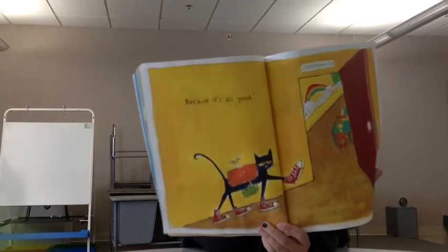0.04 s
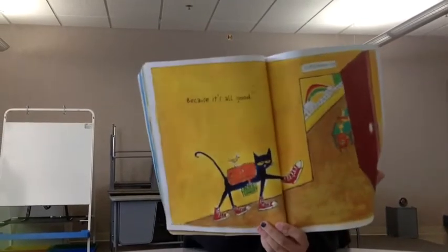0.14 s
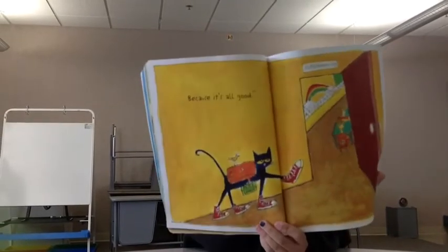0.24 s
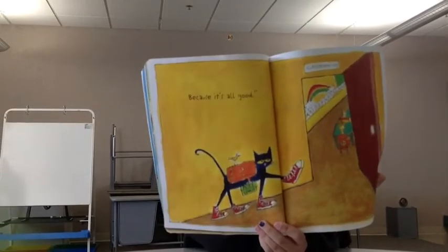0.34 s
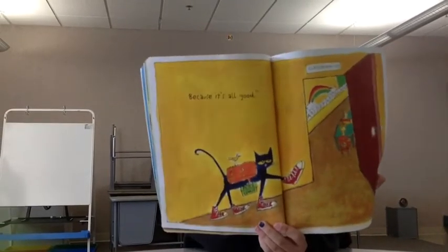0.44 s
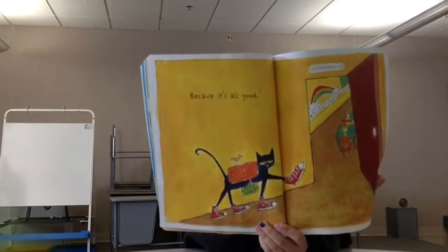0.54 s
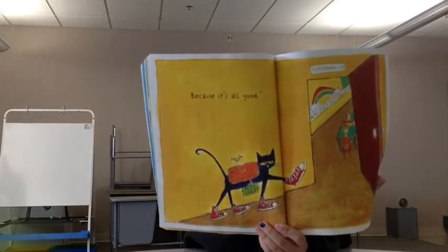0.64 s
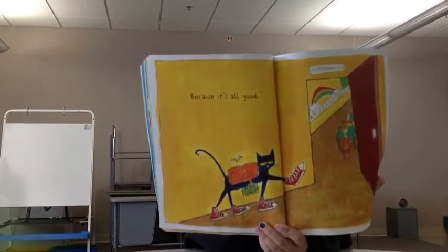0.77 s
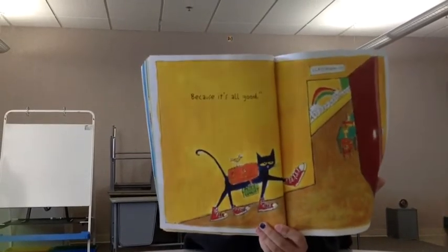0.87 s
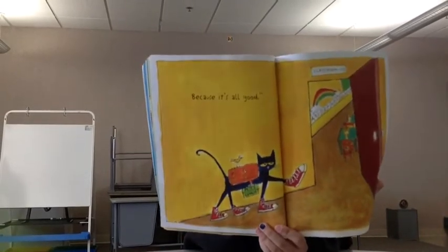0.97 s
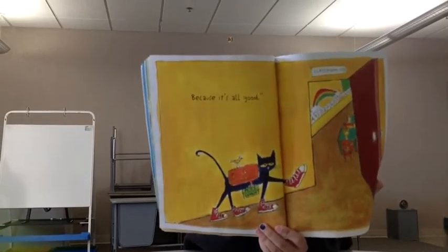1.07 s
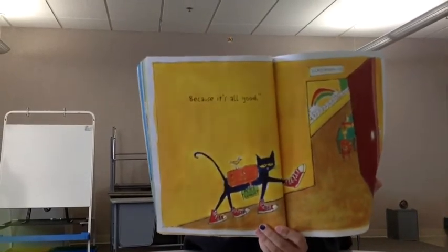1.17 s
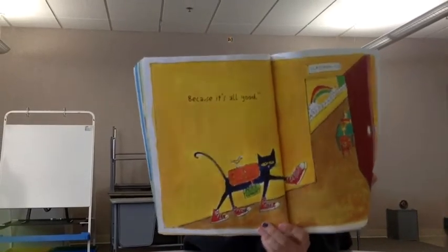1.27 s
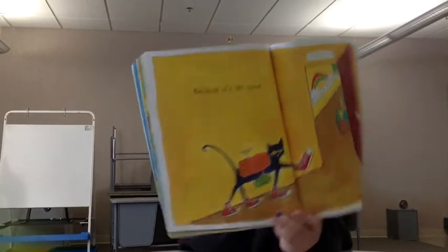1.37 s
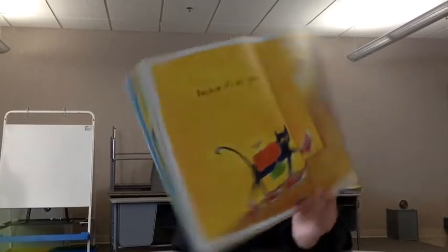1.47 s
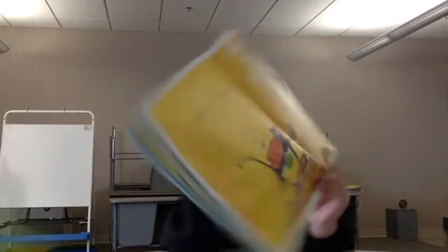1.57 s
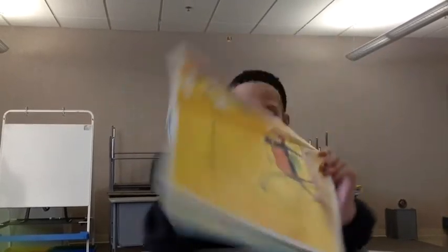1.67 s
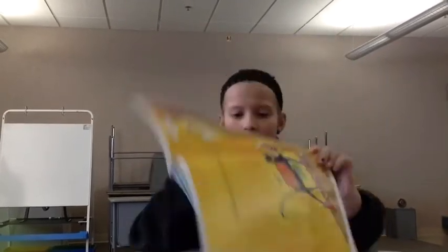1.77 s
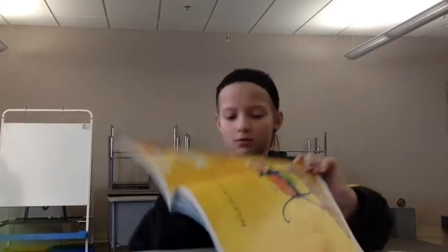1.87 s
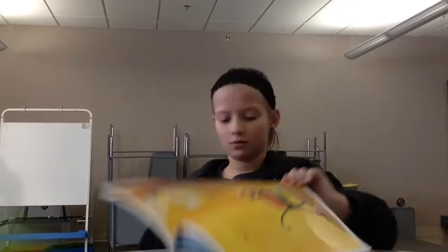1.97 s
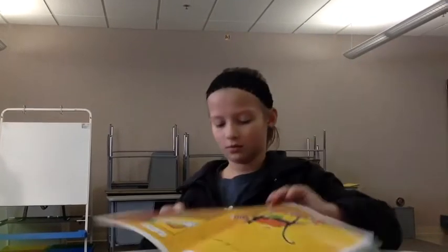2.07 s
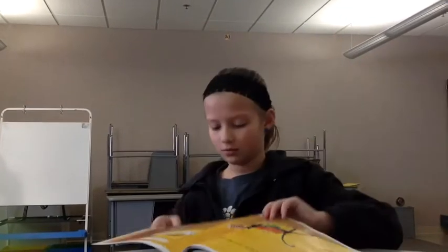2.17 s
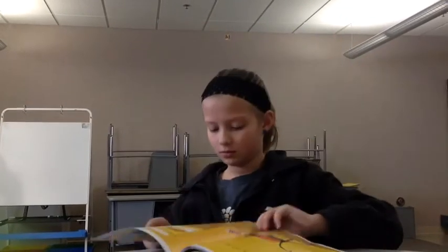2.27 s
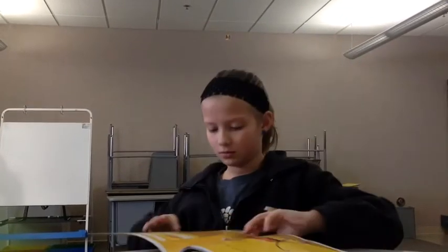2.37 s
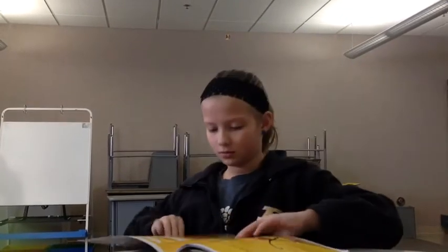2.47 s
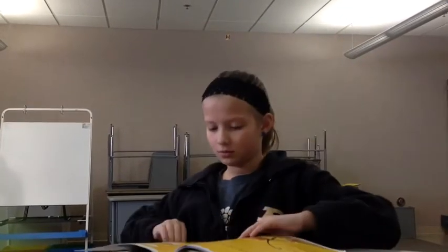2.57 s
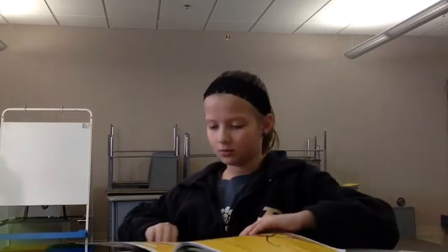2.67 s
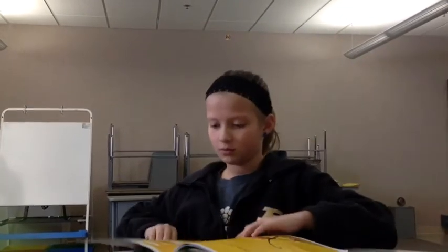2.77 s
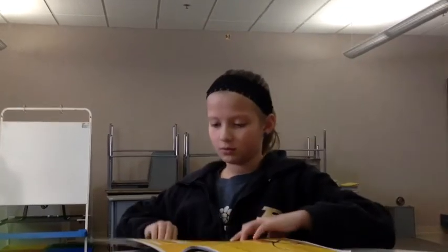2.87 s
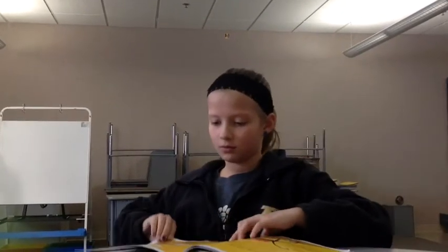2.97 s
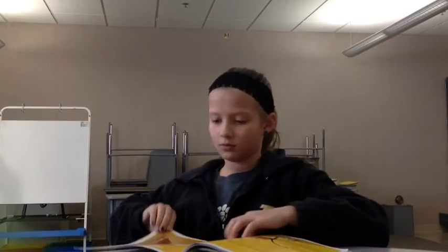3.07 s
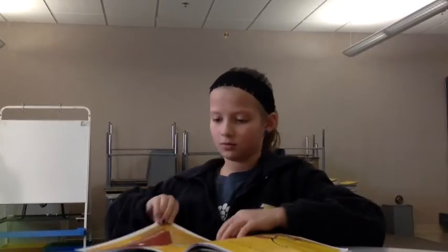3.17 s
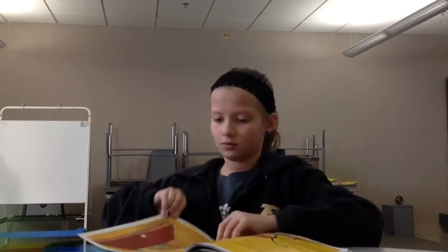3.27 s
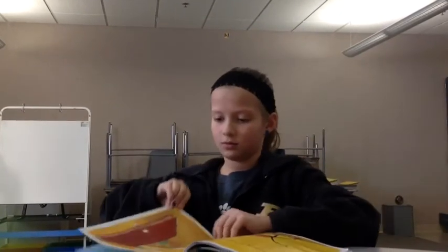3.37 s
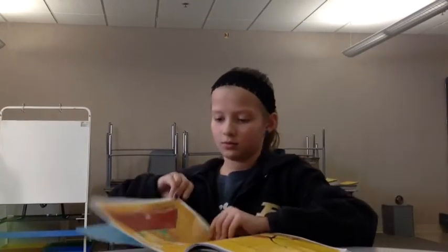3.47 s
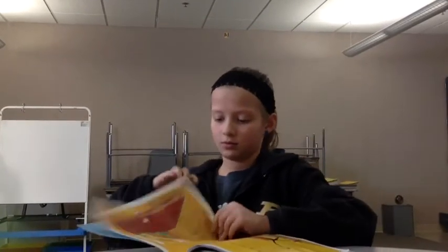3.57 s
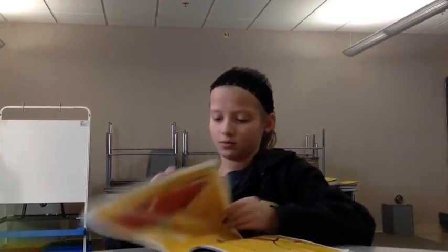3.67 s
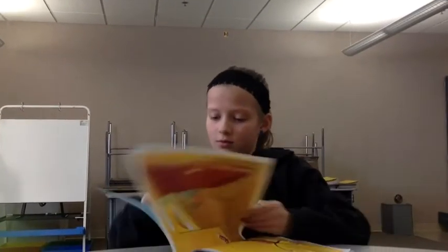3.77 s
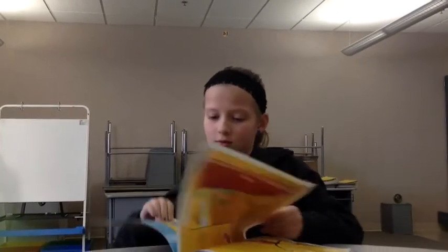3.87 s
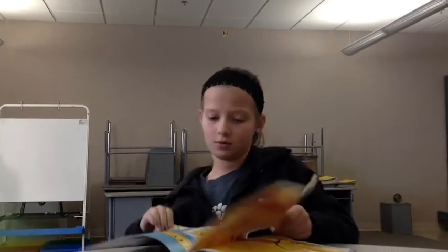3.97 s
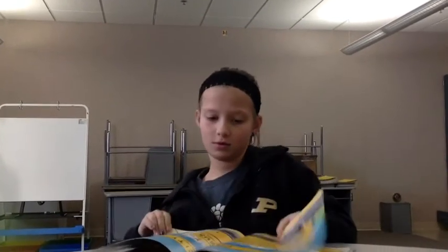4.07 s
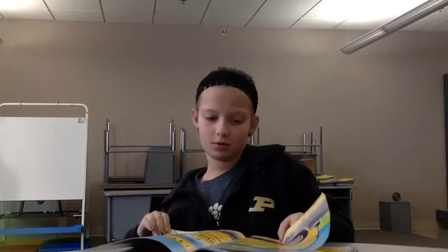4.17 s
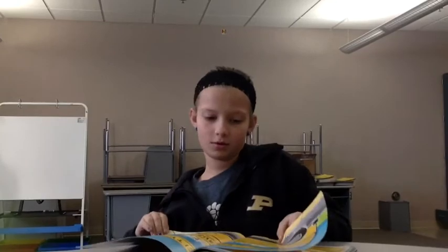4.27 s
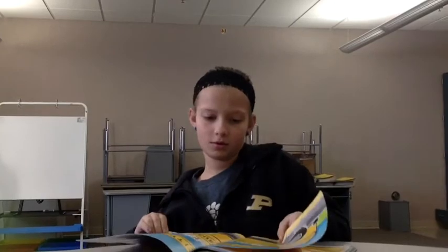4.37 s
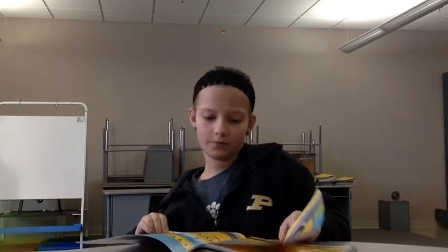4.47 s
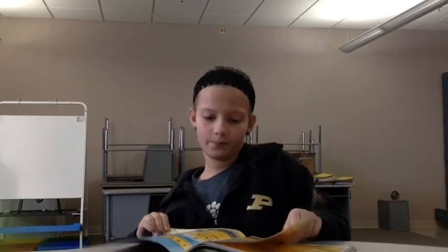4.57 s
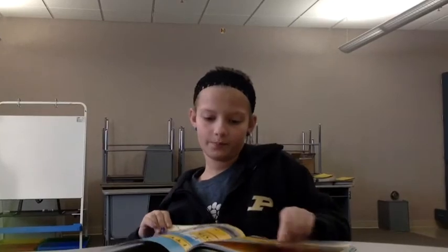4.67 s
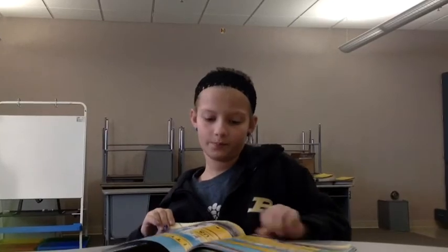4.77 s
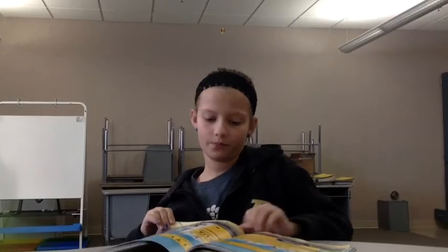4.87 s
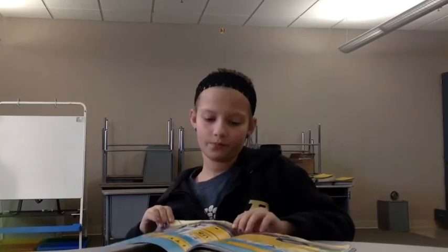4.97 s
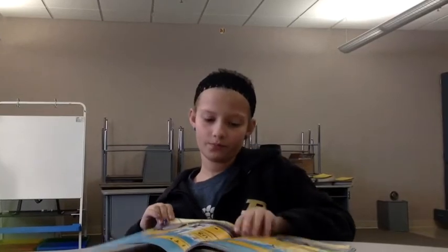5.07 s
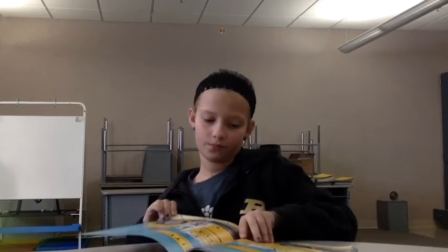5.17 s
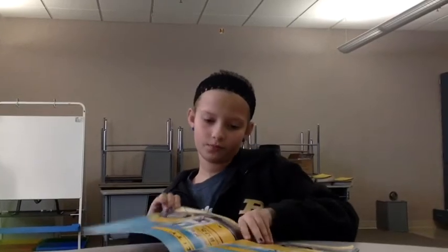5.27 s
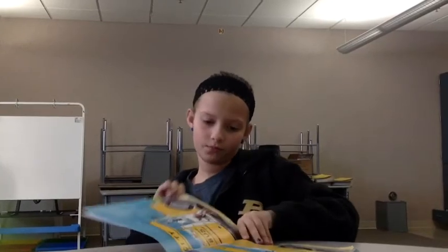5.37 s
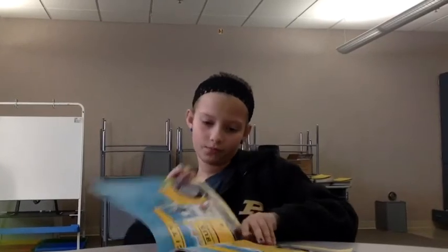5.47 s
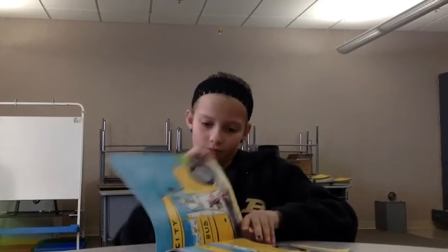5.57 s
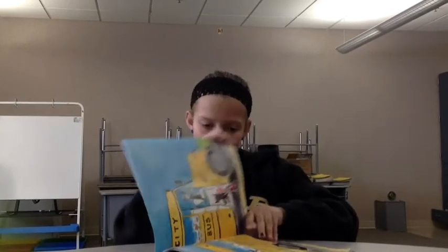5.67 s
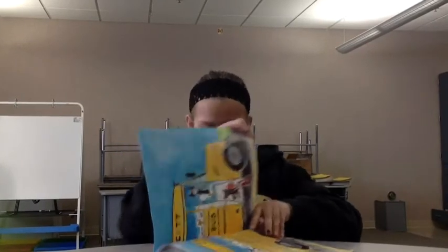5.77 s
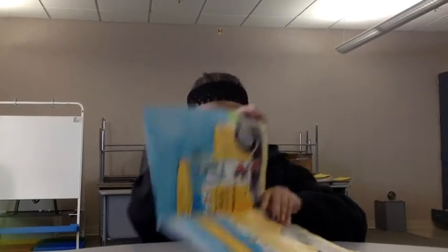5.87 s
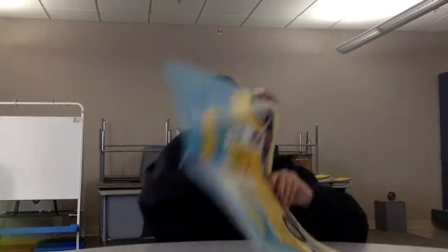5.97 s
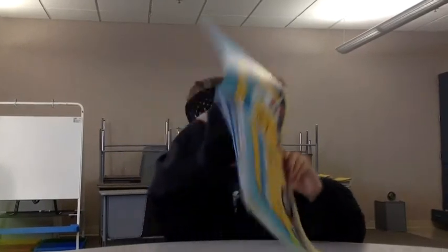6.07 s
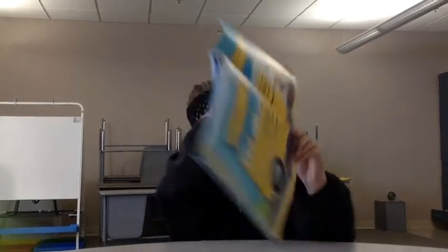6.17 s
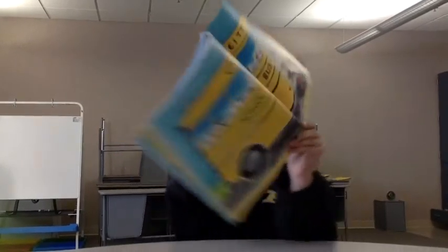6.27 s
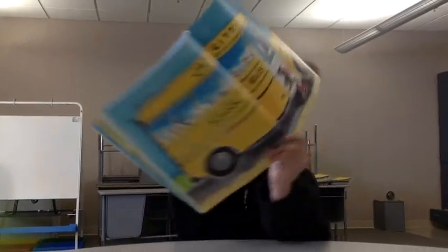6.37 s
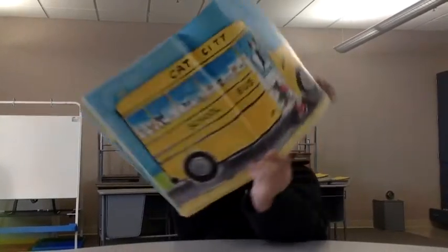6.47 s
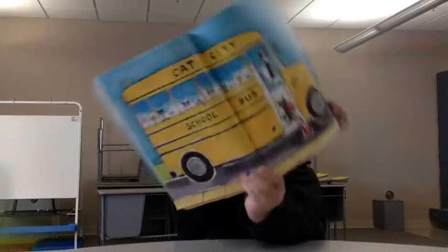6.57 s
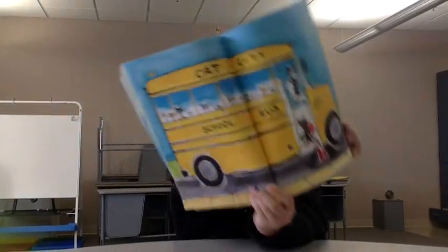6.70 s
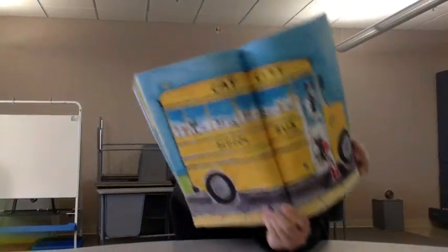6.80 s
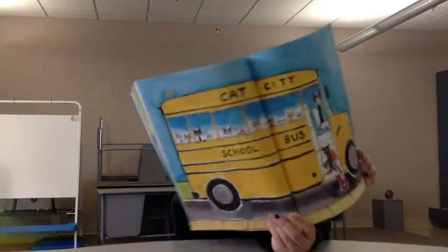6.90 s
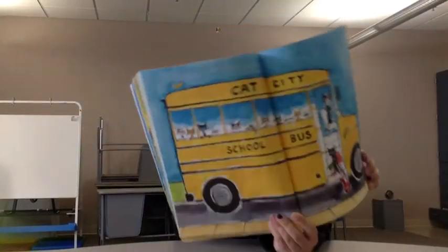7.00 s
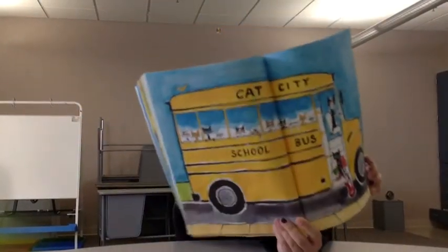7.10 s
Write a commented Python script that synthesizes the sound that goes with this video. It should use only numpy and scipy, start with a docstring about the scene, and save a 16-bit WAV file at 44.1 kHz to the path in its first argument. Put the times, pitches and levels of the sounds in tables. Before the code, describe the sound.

Close to the microphone, a big picture book is put down on a table: two dry, woody thuds with quick rebounds. Fingers scuff and flatten the paper, a large page is bent and flipped with crackling, flapping snaps, then smoothed. The book is picked up with a bright ringing paper pop, gentle knocks and faint binding pops. A small room answers briefly, with soft ventilation underneath.

```python
"""Low ventilation noise, then a soft knock: a large picture book is laid on a table, a page is turned
and smoothed, and the book is lifted again. Stiff covers knock as filtered pulses with ringing modes.
Paper snaps, crackles and buckles as pulses with bending waves; it hisses and squeaks as grainy friction.
The binding pops as short swelling sines. Reflections and a noise tail of a small room answer each sound."""
import sys
import numpy as np
from scipy import signal
from scipy.fft import rfft, irfft
from scipy.io import wavfile
from scipy.ndimage import uniform_filter1d

SR = 44100
rng = np.random.default_rng(int(sys.argv[2]) if len(sys.argv) > 2 else 0)


def store_pcm(level_fs):
    """Save levels as 16-bit WAV."""
    pcm = np.round(np.clip(level_fs, -1, 1) * 32767).astype(np.int16)
    wavfile.write(sys.argv[1], SR, np.atleast_2d(pcm).T)


N = 314874
TAPS = 2048  # pulse length, samples


def amp(db):
    """Decibels to gain."""
    return 10 ** (np.asarray(db) / 20)


def evened(x):
    """Scales to rms 1."""
    return x / np.sqrt(np.mean(x ** 2) + 1e-20)


def read(points, hz):
    """Reads a table on a log-frequency axis."""
    f, value = np.transpose(points)
    return np.interp(np.log(hz + 1), np.log(f + 1), value)


def add(mix, s, sound):
    """Mixes a sound in at time s."""
    part = mix[max(round(s * SR), 0):][:len(sound)]
    part += sound[:len(part)]


def ring(x, modes, damping_db=0):
    """Adds the short ring of each mode (pitch_hz, width_hz, level_db) to the direct pulse."""
    rings = 0
    for hz, width_hz, db in modes:
        b, a = signal.iirpeak(hz, hz / width_hz, fs=SR)
        rings = rings + amp(db) * signal.lfilter(b, a, x + 1e-18)
    return x + amp(damping_db) * rings


def sheet(low_hz, high_hz, tick_db, tick_hz=12000, steepness=4.84):
    """Causal pulse of a sheet: size sets the low edge, stiffness the high edge, the rim adds a tick."""
    hz = np.fft.rfftfreq(TAPS, 1 / SR) + 1
    body = 1 / (1 + (hz / high_hz) ** steepness)
    tick = amp(tick_db) ** 2 / (1 + (hz / tick_hz) ** 2)
    power = (body + tick) / (1 + (low_hz / hz) ** 4) + 1e-8
    # a folded cepstrum gives minimum phase
    cepstrum = irfft(np.log(power) / 2)
    cepstrum[1:TAPS // 2] *= 2
    cepstrum[TAPS // 2 + 1:] = 0
    return irfft(np.exp(rfft(cepstrum)))


PAGE_EDGE_HZ, PAGE_STRETCH = 2050, 0.56  # upper edge at which modes hold; exponent of their rise with it


def blows(rows, shiver_db, shiver_t60, shiver_low_hz, tick_hz, steepness, bend_hz, modes=()):
    """Pulses, each followed by bending waves running to and fro in the sheet; tighter bends ring higher."""
    out, t = np.zeros(N), np.arange(TAPS) / SR
    envelope = amp(-60 * t / shiver_t60) * (1 - np.exp(-t / 0.0014))
    highpass = signal.butter(1, shiver_low_hz, "high", fs=SR)
    for s, db, low_hz, high_hz, tick_db in rows:
        waves = rng.standard_normal(TAPS) * envelope
        waves *= amp(shiver_db) / np.linalg.norm(waves)
        drive = signal.unit_impulse(TAPS) + signal.lfilter(*highpass, waves)
        pulse = signal.fftconvolve(drive, sheet(low_hz, high_hz, tick_db, tick_hz, steepness))
        stretch = min((high_hz / PAGE_EDGE_HZ) ** PAGE_STRETCH, 4)
        stretched = [(hz * stretch, width_hz * stretch, level_db) for hz, width_hz, level_db in modes]
        add(out, s, amp(db) * ring(pulse, stretched))
    # bending waves carry treble faster than bass: two allpasses spread each pulse into a tiny chirp
    pole = np.exp(-2 * np.pi * bend_hz / SR)
    return signal.sosfilt([[-pole, 1, 0, 1, -pole, 0]] * 2, out + 1e-18)


# spectrum of ventilation and fine hiss, relative: (pitch_hz [Hz], density_db [dB per Hz])
AIR_SPECTRUM = [(15, -81), (25, -40), (101, -16), (129, -7.5), (173, -5), (259, 0.5), (330, -6),
                (367, -6.5), (521, -11), (845, -15), (1260, -23.5), (1450, -23), (2610, -28),
                (13500, -30.5), (15400, -34.5)]
# duct resonances: (pitch_hz [Hz], width_hz [Hz], boost_db [dB above the air noise])
DUCT_MODES = [(136.3, 14, 4), (204.8, 13, 5.5), (239.5, 7.5, 1), (358.6, 10.3, 7.5), (438, 8.6, 2.5)]
AIR_RMS_DB = -56.5


def ventilation():
    """Steady air noise, coloured by the duct's resonances."""
    hz = np.fft.rfftfreq(N, 1 / SR)
    colour_db = read(AIR_SPECTRUM, hz)
    for mode_hz, width_hz, boost_db in DUCT_MODES:
        colour_db = colour_db + boost_db / (1 + (2 * (hz - mode_hz) / width_hz) ** 2)
    noise = irfft(rfft(rng.standard_normal(N)) * amp(colour_db), N)
    return amp(AIR_RMS_DB) * evened(noise)


# a cover meets the table or a hand, levels relative: (start_s [s], level_db [dB], low_hz [Hz],
# high_hz [Hz], rim_db [dB re level], rim_hz [Hz], rim_to_flat_s [s], rebound_db [dB re level],
# ring_hz [Hz], ring_db [dB])
COVER_KNOCKS = [(0.0516, -9, 290, 750, -20, 1410, 0.0016, -21, 700, -1),
                (1.8208, 13, 235, 616, -3.5, 2700, 0.00086, -30, 370, -6),
                (1.8297, -0.5, 240, 754, -21, 2800, 0.00092, -16, 570, -3),
                (2.0443, 16, 150, 810, -7.5, 1950, 0.00022, -33, 766, 0),
                (2.053, 10.5, 320, 805, -22, 1800, 0.00047, -24, 565, 4),
                (2.0593, 8.5, 160, 600, -27, 1700, 0.00052, -26, 355, -1),
                (2.0642, 6.5, 230, 750, -20, 1900, 0.0003, -22, 470, -1),
                (2.083, 2.5, 190, 520, -22, 1900, 0.00045, -25, 295, -4),
                (2.487, -9.5, 180, 400, -24, 1200, 0.0017, -22, 290, -2),
                (5.6131, 1.5, 165, 1700, -3, 2200, 0.0005, -10, 760, -1),
                (5.7441, -2, 240, 1050, -2, 1700, 0.0014, -18, 466, 2),
                (5.8831, -6.5, 380, 1300, -0.5, 2200, 0.0024, -15, 947, 3),
                (5.8886, -4.5, 170, 1000, -9, 1800, 0.00046, -14, 760, 1),
                (5.8941, -6.5, 460, 1450, -2, 2150, 0.0006, -14, 947, 6),
                (5.8964, 0, 145, 1080, -6, 2050, 0.00021, -13, 574, 3),
                (5.905, -7, 125, 800, -8, 2000, 0.00035, -13, 371, 0)]
RIM_LOW_HZ = 1010
RIM_TICK_DB, RIM_TICK_PER_DB = -39.5, 1.5  # tick of a 0 dB crack; harder cracks are brighter


def rim_blows():
    """A cover lands rim first, with a dry crack."""
    rows = []
    for s, db, _, _, rim_db, rim_hz, *_ in COVER_KNOCKS:
        crack_db = db + rim_db
        rows.append((s, crack_db, RIM_LOW_HZ, rim_hz, RIM_TICK_DB + RIM_TICK_PER_DB * crack_db))
    return rows


REBOUND_S, REBOUND_SHRINK, REBOUND_LOSS_DB = .0074, .78, 3  # each rebound comes sooner and weaker
REBOUND_JITTER = 0.12  # share of each gap left to chance
THUD_TICK_DB = -36


def cover_blows(s, db, low_hz, high_hz, rebound_db, count=4):
    """The cover lands flat with a thud, then chatters in quickening rebounds."""
    rows = [(s, db, low_hz, high_hz, THUD_TICK_DB)]
    for k, chance in enumerate(rng.uniform(-1.28, 1, count)):
        s += REBOUND_S * REBOUND_SHRINK ** k * (1 + REBOUND_JITTER * chance)
        rows.append((s, db + rebound_db - k * REBOUND_LOSS_DB, low_hz, high_hz, THUD_TICK_DB))
    return rows


KNOCK_RING_WIDTH_HZ = 85


def thuds():
    """Each thud follows its rim's crack; the point of contact picks out one resonance of the cover."""
    out = np.zeros(N)
    for s, db, low_hz, high_hz, _, _, flop_s, rebound_db, ring_hz, ring_db in COVER_KNOCKS:
        rows = cover_blows(s + flop_s, db, low_hz, high_hz, rebound_db)
        thud = blows(rows, shiver_db=-3.5, shiver_t60=0.021, shiver_low_hz=700,
                     tick_hz=5540, steepness=5.9, bend_hz=2200)
        out += ring(thud, [(ring_hz, KNOCK_RING_WIDTH_HZ, ring_db)])
    return out


# resonances of the stiff cover: (pitch_hz [Hz], width_hz [Hz], level_db [dB before damping])
STIFF_COVER_MODES = [(151, 45, -4), (250, 90, -1), (348, 90, 0), (505, 150, -8), (673, 210, -3.5),
                     (1580, 300, -3)]
# resonance of its rim: (pitch_hz [Hz], width_hz [Hz], level_db [dB re direct pulse])
COVER_RIM_MODES = [(4700, 260, 6)]


def covers():
    """Flat thuds ring the whole cover; cracks ring its rim."""
    rims = blows(rim_blows(), shiver_db=-10, shiver_t60=0.015, shiver_low_hz=900,
                 tick_hz=8000, steepness=12, bend_hz=2200)
    flats = ring(thuds(), STIFF_COVER_MODES, damping_db=-1.5)
    return amp(-2.0) * flats + ring(rims, COVER_RIM_MODES)


def thump(push_s=0.0011, push_db=-66):
    """A landing cover pushes out a soft puff of air."""
    out, u = np.zeros(N), np.arange(TAPS) / SR / push_s
    for s, db, *_ in COVER_KNOCKS:
        add(out, s, amp(db + push_db) * u * np.exp(1 - u))
    return out


def fibres(grains_per_s=1400, catch_s=0.02):
    """Paper fibres catch and slip: random grains, their sizes, a smooth hiss and slow clumping."""
    size = np.minimum(rng.exponential(1, N), 4)
    slip = rng.standard_normal(N)
    grains = rng.choice([-1., 1.], N) * (rng.random(N) < grains_per_s / SR)
    span = max(round(catch_s * SR), 2)
    clumps = uniform_filter1d(uniform_filter1d(rng.standard_normal(N), span), span // 2)
    return grains, size, slip, evened(clumps)


def friction(fibre, start_s, end_s, spread_db, smooth=0.85, catch_db=2.5):
    """Times and drive of one grainy stretch: uneven grains in clumps over a smooth hiss."""
    at = slice(max(round(start_s * SR), 0), round(end_s * SR))
    grains, size, slip, catches = (x[at] for x in fibre)
    drive = evened(grains * amp(spread_db * size)) + smooth * slip
    clumping_db = catch_db * np.tanh(spread_db / 4) * catches
    return np.arange(N)[at] / SR, evened(drive * amp(clumping_db))


def swell(out, fibre, s, rise_s, fall_s, db, colour, spread_db, sharpness=1.52):
    """One grainy burst rises to its peak at s and falls away, along a sharpened triangle."""
    now, drive = friction(fibre, s - rise_s, s + fall_s, spread_db)
    envelope = np.interp(now, [s - rise_s, s, s + fall_s], [0, 1, 0]) ** sharpness
    add(out, now[0], amp(db) * signal.fftconvolve(drive * envelope, colour))


# paper hisses, scuffs and crunches; the 5.617 s row is the bright fizz of a pop. Levels relative:
# (peak_s [s], rise_s [s], fall_s [s], level_db [dB], low_hz [Hz], high_hz [Hz], hiss_db [dB re body])
PAPER_SCUFFS = [(.197, 0.13, 0.099, -55, 300, 2350, -18), (1.84, 0.25, 0.26, -44, 241, 1410, -15),
                (2.062, 0.034, 0.14, -36, 800, 2250, -28), (2.1, 0.028, 0.1, -42, 400, 900, -15),
                (2.262, 0.037, 0.042, -42, 450, 1800, -10), (2.383, 0.0099, 0.067, -44, 7030, 14460, -14),
                (2.89, 0.16, 0.07, -40, 150, 1100, -19.5), (3.05, 0.042, 0.06, -48.5, 900, 3000, -19),
                (3.16, 0.082, 0.098, -46.5, 1170, 6300, -6), (3.214, 0.067, .055, -45, 1170, 6200, -10),
                (3.32, 0.033, 0.058, -40, 400, 3550, -22), (3.392, 0.054, 0.042, -54, 500, 4000, -3),
                (3.503, 0.0037, 0.072, -35.5, 496, 2920, -14), (3.627, 0.035, 0.027, -39, 250, 2600, -37),
                (3.966, 0.012, .08, -31, 700, 1550, -56), (4.062, 0.051, 0.044, -34.5, 450, 1550, -45),
                (4.336, 0.0092, 0.066, -44, 400, 3110, -33), (4.43, 0.057, 0.17, -43, 704, 2620, -24),
                (4.61, 0.12, 0.066, -49.5, 300, 5130, -21), (4.776, 0.075, 0.21, -58.5, 1180, 7600, -6.5),
                (5.1, .04, 0.057, -53, 610, 4450, -23), (5.4, 0.055, 0.1, -39.5, 403, 2100, -23),
                (5.565, 0.18, 0.04, -40.5, 398, 1590, -31), (5.607, 0.0035, 0.045, -31, 350, 1900, -25),
                (5.738, 0.016, 0.04, -41, 800, 1700, -40), (5.897, 0.016, 0.018, -32, 550, 1400, -48),
                (5.92, 0.033, 0.17, -54.5, 3500, 6000, -14), (5.617, .012, 0.03, -38.5, 9500, 13000, -22),
                (6.055, 0.15, 0.13, -54, 11000, 15000, -16), (6.198, 0.14, .1, -55, 7100, 12500, -11)]
SCUFF_GRAIN_DB, SCUFF_GRAIN_HZ = 2, 2000  # size spread at this high edge; brighter scuffs are more even


def scuffs(fibre):
    """Hisses, scuffs and crunches of paper: swelling grainy noise, each in its own band."""
    out = np.zeros(N)
    for s, rise_s, fall_s, db, low_hz, high_hz, hiss_db in PAPER_SCUFFS:
        spread_db = SCUFF_GRAIN_DB * SCUFF_GRAIN_HZ / high_hz
        swell(out, fibre, s, rise_s, fall_s, db, sheet(low_hz, high_hz, hiss_db), spread_db)
    return out


def flex(x, patchy_db=1.7, count=5):
    """A bending sheet keeps shifting its resonances, so the colour of its rustle comes and goes."""
    z = signal.stft(x, SR, nperseg=512, noverlap=384)[2]
    patches = rng.standard_normal(z.shape)
    for axis in (0, 1):
        patches = uniform_filter1d(uniform_filter1d(patches, count, axis), count, axis)
    gain = evened(amp(patchy_db * evened(patches)))
    return signal.istft(z * gain, SR, nperseg=512, noverlap=384)[1][:N]


# resonances of a bowed page: (pitch_hz [Hz], width_hz [Hz], level_db [dB before damping]);
# pitch and width before stretching by the bend
BOWED_PAGE_MODES = [(443, 240, -0.5), (1200, 98, -12), (1610, 110, -8), (2480, 210, -18)]


def paper():
    """All grainy paper noise; fingers damp the page while it slides, so it rings less."""
    fibre = fibres()
    rustle = scuffs(fibre) + squeaks(fibre) + bends(fibre)
    return amp(-0.5) * ring(flex(rustle), BOWED_PAGE_MODES, damping_db=-12)


# small creases snap and page edges flick, levels relative: (start_s [s], level_db [dB],
# high_hz [Hz], tick_db [dB re body])
CREASE_SNAPS = [(.1568, -25.5, 2610, -40), (.236, -25, 2860, -22), (1.7506, -17, 1750, -29),
                (1.7715, -18, 1950, -31), (2.1035, -9.5, 2730, -33), (2.133, -15, 6560, -2),
                (2.156, -12.5, 2280, -13), (2.3787, -8.5, 2700, -4), (2.535, -8.5, 1510, -8),
                (2.5794, -17.5, 3440, -22), (2.6724, -26, 2370, -10), (2.7377, -16.5, 3180, -39),
                (3.2449, -17.5, 6440, -23), (3.3245, -20, 4300, -25), (3.3608, -11, 1500, -14.5),
                (3.3895, -14, 4800, -20), (3.3985, -18, 5500, -30), (3.4418, -8.5, 1700, -13.5),
                (3.4998, -10, 4760, -10), (3.5552, -14, 2770, -11), (3.593, -12, 1890, -27),
                (3.628, -7, 4300, -24), (3.677, -21, 2600, -27), (3.6992, -11, 1800, -29),
                (3.7558, -3.5, 2050, -23), (3.8336, -1.5, 1460, -39), (3.9121, -5, 1600, -42),
                (3.9386, -2.5, 2160, -42), (3.941, -5, 2000, -40), (3.963, -4.5, 3020, -44),
                (4.0085, -15, 3600, -36), (4.0155, -11, 1490, -41), (4.0317, -5.5, 2400, -36),
                (4.1657, -16.5, 3280, -23), (4.3081, -16, 2630, -29), (4.3168, -20, 3200, -25),
                (4.3236, -4, 3200, -25), (4.3319, -13, 4600, -26), (4.3445, -17, 4000, -28),
                (4.4178, -4, 3050, -21), (4.4502, -18, 4500, -28), (4.463, -18, 3000, -28),
                (4.4265, -10.5, 4290, -35), (4.4415, -8.5, 2370, -35), (4.5255, -26, 3200, -16),
                (4.583, -21.5, 7460, -14), (4.6029, -9, 4300, -23), (4.6052, -12.5, 4000, -29),
                (4.6327, -19.5, 2100, -8), (4.821, -26.5, 7480, -20), (4.905, -27.5, 5230, -8),
                (4.973, -30, 4400, -28), (5.1472, -21.5, 1800, -11), (5.3857, -7.5, 2030, -25),
                (5.4056, -15.5, 5100, -35), (5.6071, -0.5, 3400, -16), (5.6095, -5, 2900, -29),
                (5.6765, -24, 2480, -30), (5.7962, -11.5, 1940, -24), (6.015, -12.5, 1070, -23),
                (6.2361, -15.5, 1460, -26), (6.2876, -8, 1300, -24), (6.2981, -29, 8150, 5.5),
                (6.6152, -15.5, 1710, -18), (6.5707, -17, 1100, -18), (6.7525, -17.5, 2020, -30),
                (7.079, -28.5, 13600, -12)]
SNAP_SPAN = 2.84  # upper edge over lower edge


def pages():
    """Clear snaps, quick clusters and faint crackles, each a pulse that rings the bowed page."""
    rows = list(CREASE_SNAPS) + clusters() + crackles()
    rows = [(s, db, hz / SNAP_SPAN, hz, tick_db) for s, db, hz, tick_db in rows]
    return amp(-3.0) * blows(rows, shiver_db=-1.5, shiver_t60=0.0076, shiver_low_hz=1530,
                             tick_hz=11100, steepness=7.5, bend_hz=3000, modes=BOWED_PAGE_MODES)


# a fingertip drags on the glossy page, levels relative: (loudest_s [s], length_s [s],
# level_db [dB], pitch_hz [Hz], ring_db [dB])
FINGER_SQUEAKS = [(2.121, 0.024, -33.5, 3530, -1), (2.391, 0.12, -41, 2550, -5),
                  (2.438, 0.014, -42, 3050, -3), (2.458, 0.024, -39, 1100, 7),
                  (4.584, 0.022, -46, 6740, -15)]
SQUEAK_SPAN, SQUEAK_GRAIN_DB = 1.22, -1  # ratio of each band edge to the pitch; spread of grain sizes
SQUEAK_Q = 13


def squeaks(fibre):
    """A dragging fingertip: brief friction in a narrow ringing band."""
    out = np.zeros(N)
    for s, length_s, db, hz, ring_db in FINGER_SQUEAKS:
        band = sheet(hz / SQUEAK_SPAN, hz * SQUEAK_SPAN, tick_db=-20, steepness=17)
        colour = ring(band, [(hz, hz / SQUEAK_Q, ring_db)])
        swell(out, fibre, s, length_s / 2, length_s / 2, db, colour, SQUEAK_GRAIN_DB)
    return out


# effort of bending paper, one curve for each move: (time_s [s], level_db [dB, relative])
FLATTENING_EFFORT = [(2.2, -58), (2.336, -65.5), (2.468, -57), (3.13, -65), (3.25, -58)]
PAGE_TURN_EFFORT = [(3.249, -58.5), (3.394, -58), (3.66, -51), (3.735, -47.5), (3.883, -50.5), (3.938, -57),
                    (4.074, -53.5), (4.134, -55.5), (4.25, -62)]
SETTLING_EFFORT = [(4.25, -58), (4.512, -65), (4.649, -59.5), (4.88, -63.5), (5.3, -63.5)]
LIFTING_EFFORT = [(5.3, -71), (5.428, -60), (5.558, -55), (5.72, -63)]
OPENING_EFFORT = [(5.95, -58.5), (6.276, -59.5), (6.446, -55.5), (6.676, -63), (6.862, -63), (7.1, -68)]
MOVES = [FLATTENING_EFFORT, PAGE_TURN_EFFORT, SETTLING_EFFORT, LIFTING_EFFORT, OPENING_EFFORT]
BEND_LOW_HZ, BEND_HIGH_HZ, BEND_DB, BEND_GRAIN_DB = 310, 1920, 10.5, 5
FIRM_DB, FIRM_GROWTH = -45.5, 1.27  # effort of a firm bend; dB of rustle per dB of effort
FIZZ_DB, FIZZ_GROWTH, FIZZ_LOW_HZ, FIZZ_HIGH_HZ = -61.5, 0.37, 1940, 6700  # grows much less


def bends(fibre, fade_s=0.023):
    """Bending paper rubs fibre on fibre: a rustling body that grows with effort, and a fine fizz."""
    out = np.zeros(N)
    body = sheet(BEND_LOW_HZ, BEND_HIGH_HZ, tick_db=-27)
    fizz = sheet(FIZZ_LOW_HZ, FIZZ_HIGH_HZ, tick_db=-6)
    for move in MOVES:
        times, levels = np.transpose(move)
        now, drive = friction(fibre, times[0] - fade_s, times[-1] + fade_s, BEND_GRAIN_DB)
        to_edge_s = np.minimum(now - now[0], now[-1] - now)
        drive = drive * np.minimum(to_edge_s / (2 * fade_s), 1) ** .5
        effort_db = np.interp(now, times, levels) - FIRM_DB
        body_gain = amp(FIRM_DB + BEND_DB + FIRM_GROWTH * effort_db)
        fizz_gain = amp(FIZZ_DB + FIZZ_GROWTH * effort_db)
        add(out, now[0], signal.fftconvolve(drive * body_gain, body))
        add(out, now[0], signal.fftconvolve(drive * fizz_gain, fizz))
    return out


CRACKLES_PER_S, CRACKLE_ABOVE_DB, CRACKLE_SPREAD_DB = 16, 31, 2  # rate; level above the effort curve
CRACKLE_HZ, CRACKLE_SPREAD_OCTAVES, CRACKLE_TICK_DB = 2350, 0.71, -26


def crackles(count=50):
    """Faint crackles come at random while paper bends, and grow with the effort."""
    rows = []
    for move in MOVES:
        times, levels = np.transpose(move)
        moments = times[0] + np.cumsum(rng.exponential(1, count)) / CRACKLES_PER_S
        for s, (size, colour) in zip(moments, rng.standard_normal((count, 2))):
            if s < times[-1]:
                db = np.interp(s, times, levels) + CRACKLE_ABOVE_DB + CRACKLE_SPREAD_DB * size
                hz = CRACKLE_HZ * 2 ** (CRACKLE_SPREAD_OCTAVES * colour)
                rows.append((s, db, hz, CRACKLE_TICK_DB))
    return rows


# paper crackles in quick clusters, or a page edge flutters, levels relative: (start_s [s],
# length_s [s], level_db [dB], drift_db [dB over the length], high_hz [Hz])
CRACKLE_CLUSTERS = [(3.5025, .03, -8, -10, 2400), (3.6915, .011, -8, 0, 1600), (3.766, .028, -18, 3, 1700),
                    (3.885, .025, -16, 2, 1300), (3.968, .045, -5.5, -7, 1800), (4.042, .036, -13, 1, 1800),
                    (4.338, .02, -18, -2, 3300), (4.435, .034, -17.5, -5, 3300),
                    (4.608, .024, -21, -4, 5900)]
TICKS_PER_S, TICK_JITTER, TICK_SPREAD_DB, TICK_TREBLE_DB = 160, .45, 3, -38  # jitter: share of a gap


def clusters(count=24):
    """A cluster ticks at uneven intervals, its level drifting down or up."""
    rows = []
    for start_s, length_s, db, drift_db, hz in CRACKLE_CLUSTERS:
        for k, (late, size, colour) in enumerate(rng.uniform(-1, 1, (count, 3))):
            s = (k + TICK_JITTER * late) / TICKS_PER_S
            if s < length_s:
                level_db = db + drift_db * s / length_s + TICK_SPREAD_DB * size
                tick_edge_hz = hz * 2 ** (CRACKLE_SPREAD_OCTAVES * colour)
                rows.append((start_s + s, level_db, tick_edge_hz, TICK_TREBLE_DB))
    return rows


# a whole sheet pops through, levels relative: (start_s [s], level_db [dB], low_hz [Hz],
# high_hz [Hz], tick_db [dB re body], ring_hz [Hz], ring_width_hz [Hz], ring_db [dB])
SHEET_BUCKLES = [(3.78, -1, 594, 1800, -37, 1205, 260, 0), (3.8051, 7.5, 298, 890, -42, 463, 150, 4.5),
                 (3.807, 7, 714, 2430, -37, 1220, 200, 4.5), (3.9231, 0, 600, 1590, -46, 820, 200, 5),
                 (3.925, -1.5, 650, 2560, -50, 1090, 220, 7.5),
                 (3.9273, -5.5, 650, 2180, -42, 1150, 300, 4), (5.6163, 3, 660, 2750, -17.5, 1640, 130, 14),
                 (5.6195, -1, 400, 2200, -20, 700, 130, 2)]


def buckles():
    """Each sheet that pops through rings briefly at a pitch set by its bow."""
    out = np.zeros(N)
    for *row, ring_hz, width_hz, ring_db in SHEET_BUCKLES:
        pop = blows([row], shiver_db=-2.5, shiver_t60=0.021, shiver_low_hz=1200,
                    tick_hz=11000, steepness=6.7, bend_hz=1910)
        out += ring(pop, [(ring_hz, width_hz, ring_db)])
    return amp(-2.0) * out


# hollow pops as the book is opened wide: (start_s [s], level_db [dB, relative], pitch_hz [Hz])
BINDING_POPS = [(6.423, -28.5, 700), (6.4617, -29, 750)]


def binding(swell_s=0.0018, click_db=11):
    """The spine gives way: a small click, then a few cycles of the hollow behind it."""
    out, t = np.zeros(N), np.arange(TAPS) / SR
    envelope = (t / swell_s * np.exp(1 - t / swell_s)) ** 2
    click = amp(click_db) * sheet(low_hz=800, high_hz=1890, tick_db=-12)
    for s, db, hz in BINDING_POPS:
        add(out, s, amp(db) * (envelope * np.sin(2 * np.pi * hz * t) + click))
    return out


# nearby surfaces: (delay_s [s], gain [ratio before the lowpass])
NEAR_REFLECTIONS = [(.0021, 0.043), (.0053, -0.044), (.0094, 0.1), (0.0113, 0.13), (0.0185, -.12),
                    (.0215, 0.079)]
# decay of the room's tail: (pitch_hz [Hz], t60_s [s])
TAIL_T60 = [(120, 0.5), (300, 0.48), (1000, 0.48), (3000, 0.96), (8000, 0), (15000, 2)]
# colour of the room's tail: (pitch_hz [Hz], level_db [dB])
TAIL_DB = [(100, 1), (280, 0.9), (700, -7), (2000, -13.5), (3200, -11), (5000, -7), (14000, -10)]


def room(x, far):
    """Direct sound and near reflections; what travels far returns as taps that die band by band."""
    near = np.zeros(N)
    for delay_s, gain in NEAR_REFLECTIONS:
        add(near, delay_s, gain * x)
    near = signal.lfilter(*signal.butter(1, 4000, fs=SR), near)
    taps = rng.choice([-1., 1.], SR) * (rng.random(SR) < 5000 / SR)
    hz, t, z = signal.stft(taps, SR, nperseg=256)
    t60_s = read(TAIL_T60, hz)[:, None]
    # normalise band energy for decay time before the band level
    decay = amp(-60 * t / t60_s) * np.sqrt(2 * np.log(1000) / t60_s / np.sum(taps ** 2))
    level = amp(read(TAIL_DB, hz))[:, None]
    tail = signal.istft(z * decay * level, SR, nperseg=256)[1]
    tail *= 1 - np.exp(-(np.arange(len(tail)) / SR / 0.003) ** 2)  # soft onset
    return x + near + signal.fftconvolve(far, tail)[:N]


def scene():
    """Covers, pages and binding in the room, over the ventilation."""
    air = ventilation()
    knocks, rustle, creases, sheets, spine = covers(), paper(), pages(), buckles(), binding()
    # bowed sheets and the narrow spine send less of their sound into the room
    far = amp(-2.5) * (knocks + rustle) + amp(-2.0) * creases
    far += amp(-5.5) * sheets + amp(-6) * spine
    sound = room(knocks + rustle + creases + sheets + spine, far)
    # air slips round the edges of the book, so it radiates little bass
    sound = signal.sosfilt(signal.butter(4, 118, "high", fs=SR, output="sos"), sound)
    return (sound + thump() + air)[None]


EDGE_HZ = 15600


def record(dry):
    """Linear-phase lowpass: the upper band limit."""
    lowpass = signal.firwin(511, EDGE_HZ, window=("kaiser", 9), fs=SR)
    return signal.oaconvolve(dry, lowpass[None], "same")


dry = scene()
out = record(dry)
store_pcm(out)
```